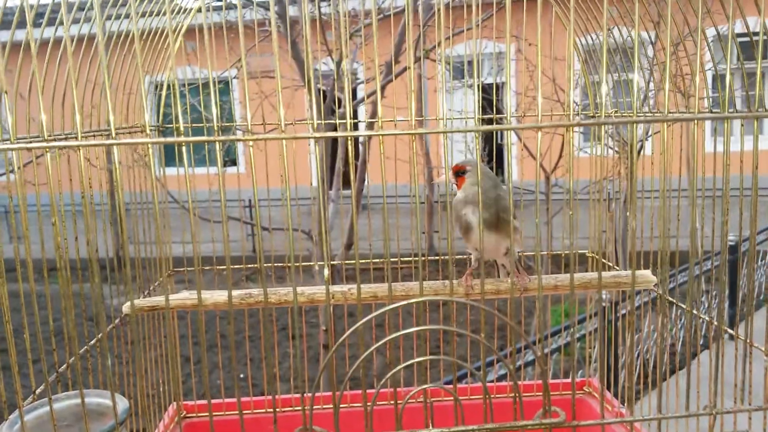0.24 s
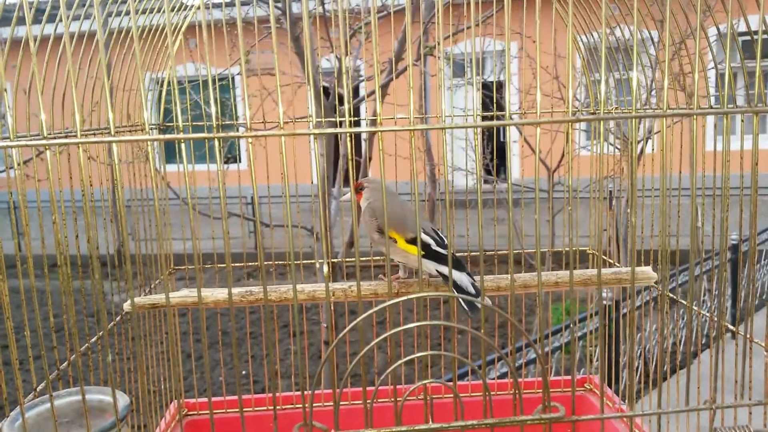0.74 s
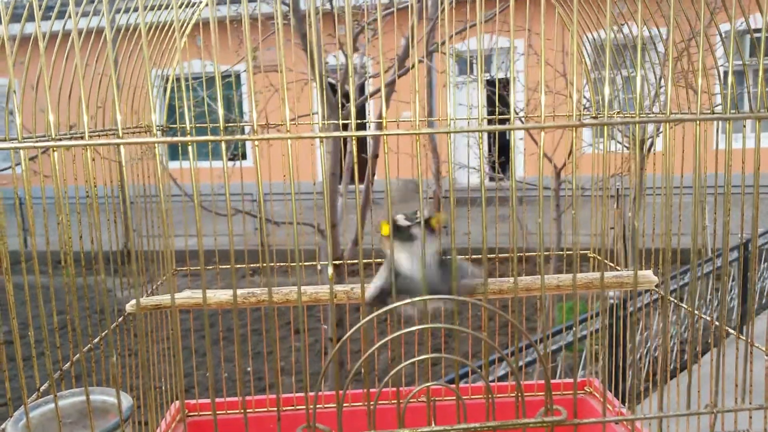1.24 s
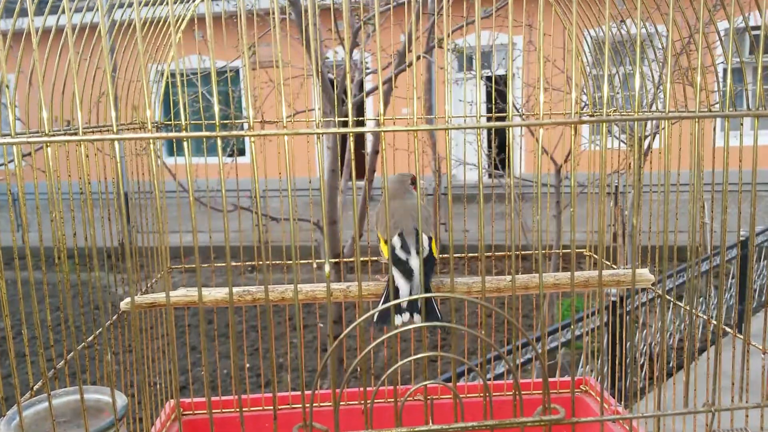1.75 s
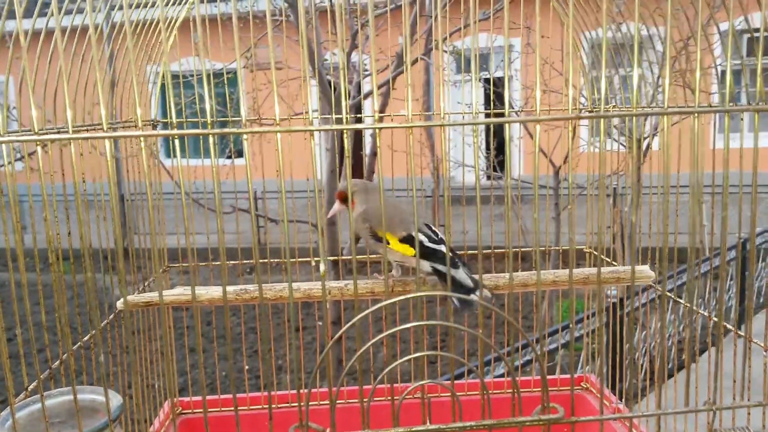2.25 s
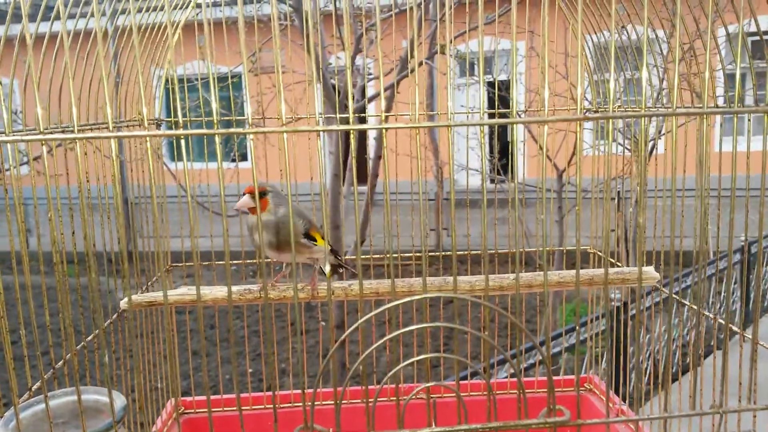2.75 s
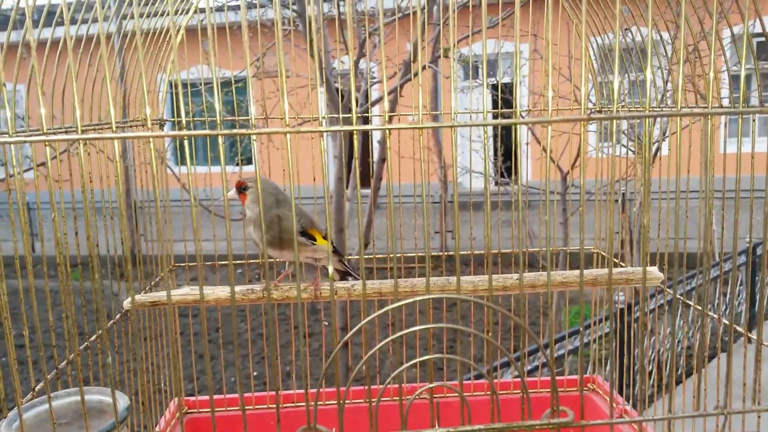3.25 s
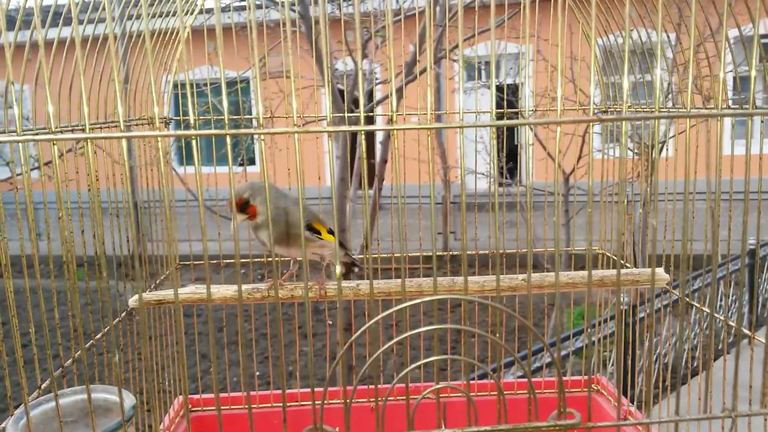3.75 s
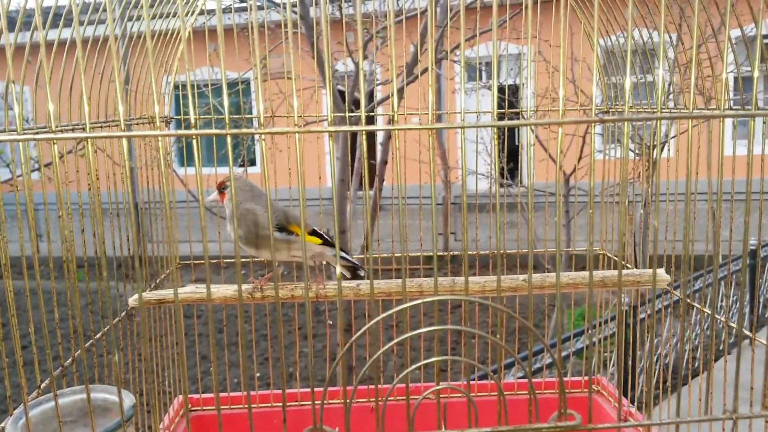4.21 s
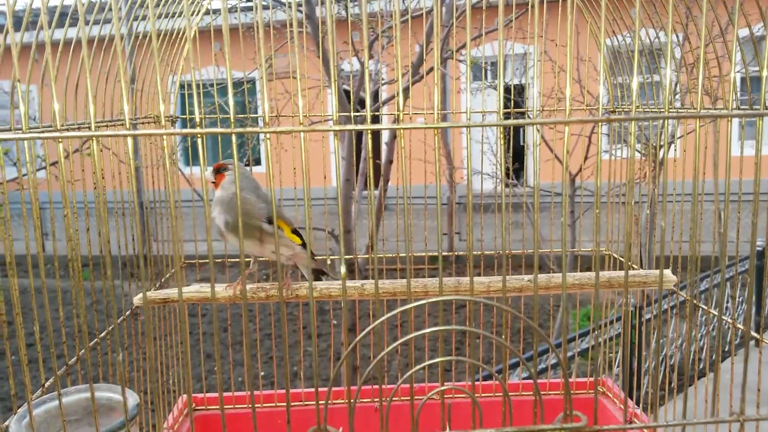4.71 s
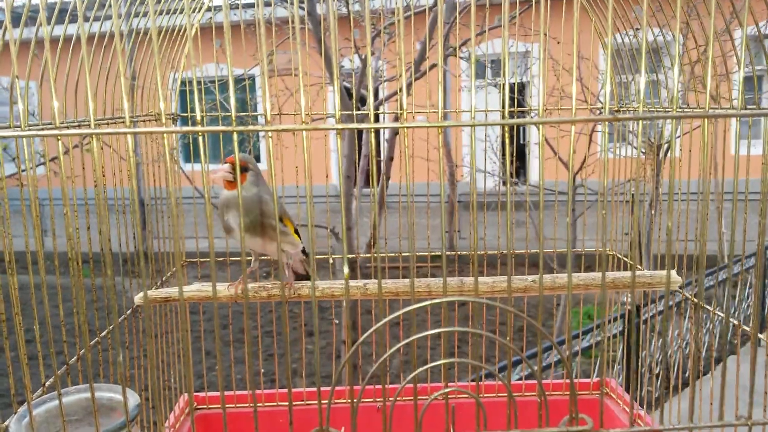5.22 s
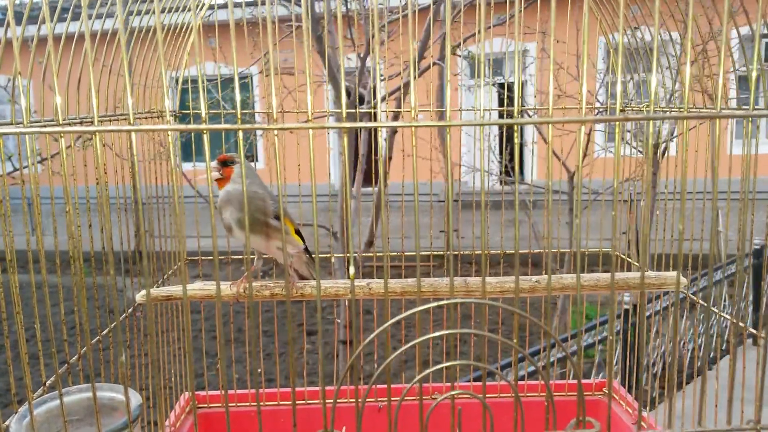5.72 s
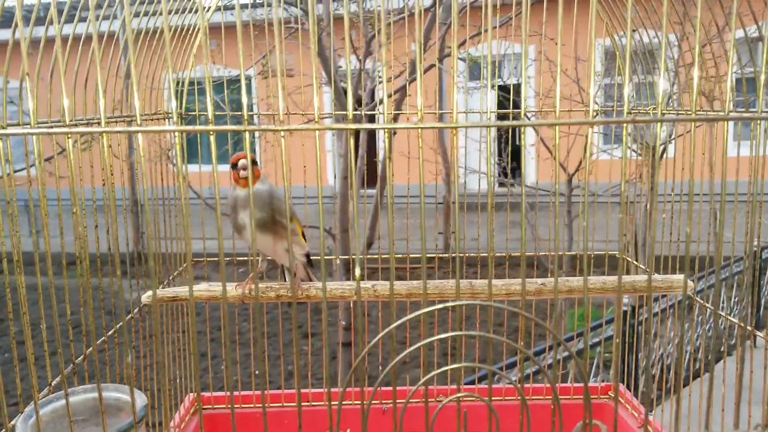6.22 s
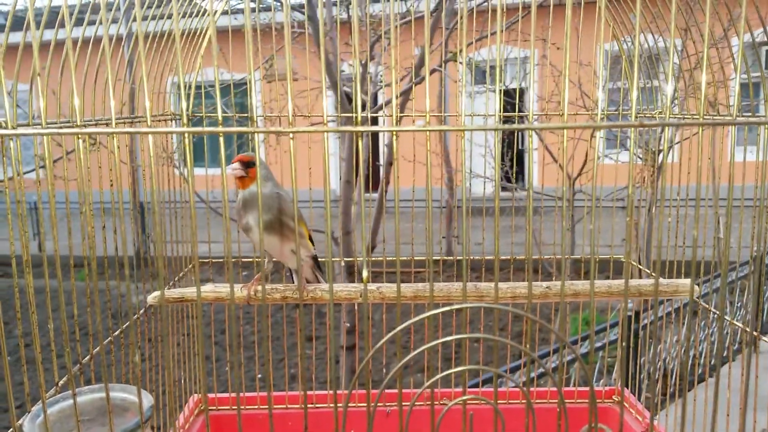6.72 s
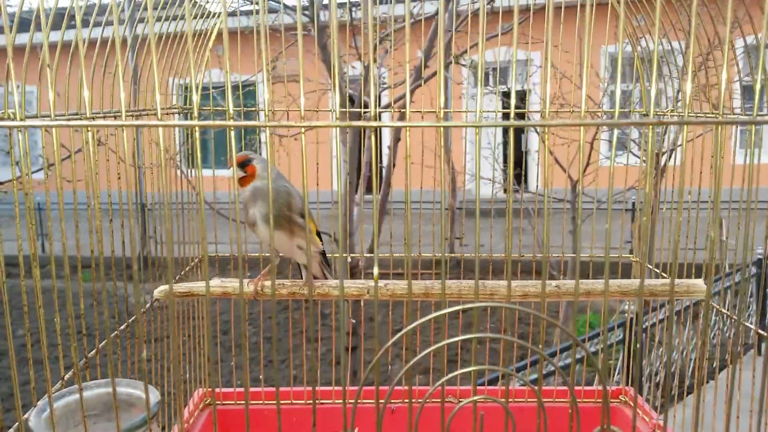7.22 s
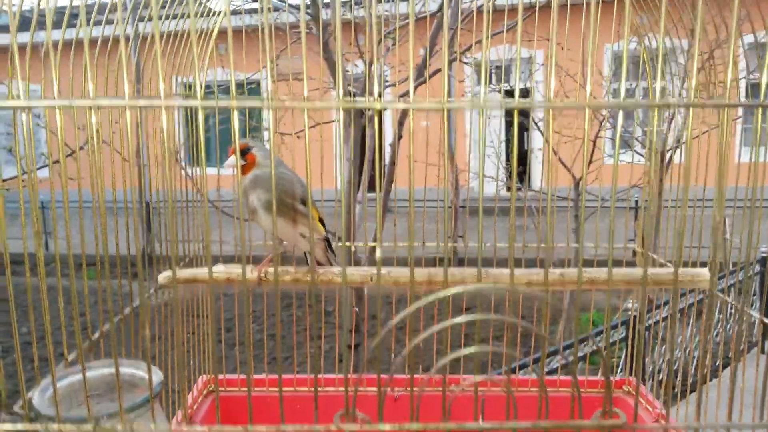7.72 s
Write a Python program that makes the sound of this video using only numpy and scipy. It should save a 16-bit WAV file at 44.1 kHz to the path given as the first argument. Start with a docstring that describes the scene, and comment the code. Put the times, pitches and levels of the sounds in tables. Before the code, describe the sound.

Outdoor air with faint echoing chirps and a slight feather rustle leads to a small finch's buzzy note, two-voiced falling whistle and rapid ticking chatter. Distant thin calls linger. A dull knock near the handheld microphone brings about a second and a half of airy hiss, then bright, piercing notes tumble out at close range, lightly reverberant, before near silence with soft handling thuds.

```python
"""Outdoor air and faint reverberant calls open the scene; then a caged goldfinch sings close by in a yard.
Gliding membrane tones make its whistles, two-voiced notes, buzzes and trills; pitch arches make its chatter.
Cage and wall answer as single echoes and a diffuse tail; runs of gliding tones, mostly reverberation,
make distant calls, a lingering chirp tail and a high hazy wash. Shaped noise gives air, rumble, rustle and
ticks, low sines the soft thuds; a knock of ringing modes is followed by a rush of hiss."""
import sys
import numpy as np
from scipy import signal
from scipy.fft import rfft, irfft, next_fast_len
from scipy.io import wavfile
from scipy.ndimage import uniform_filter1d, minimum_filter1d, map_coordinates

SR = 44100
rng = np.random.default_rng(int(sys.argv[2]) if len(sys.argv) > 2 else 0)


def inscribe(sig):
    """Save sig as 16-bit PCM at rate SR to the path in sys.argv[1].

    A 1-D sig is mono; a 2-D sig holds one channel per row.
    Samples are clipped to [-1, 1] before scaling.
    """
    pcm = np.round(np.clip(np.atleast_2d(sig).T, -1, 1) * 32767)
    wavfile.write(sys.argv[1], SR, pcm.astype(np.int16))


N = 351036
TIME = np.arange(N) / SR

# Clear notes of the high side of the syrinx: (start [s], length [s], onset [Hz], glide from [Hz],
# glide to [Hz], relative level [dB], level change over the note [dB], attack [s], release [s])
HIGH_NOTES = [(0.694, 0.025, 4190, 6580, 5350, -30.5, -2, .003, 0.0075),
              (1.334, 0.17, 4152, 6140, 6154, -13.5, -5, 0.029, 0.008),
              (1.503, 0.23, 6190, 5330, 3707, -14, -11, 0.015, 0.031),
              (5.036, 0.039, 3100, 4840, 4926, -9.5, 6, 0.0086, 0.0082),
              (5.157, 0.028, 8400, 7530, 8340, -9.5, -2, 0.008, 0.025),
              (5.221, 0.048, 3565, 5720, 5905, -7, 4, 0.0071, 0.018),
              (5.346, 0.22, 4100, 4424, 5958, -8.5, 3.5, .12, 0.02),
              (5.645, 0.0066, 5335, 4800, 9500, -13.5, -17, 0.0018, 0.0022),
              (5.653, 0.034, 10200, 9080, 7760, -21.5, 12.5, 0.0022, 0.0031),
              (5.679, .074, 8200, 7610, 6530, -9, -2, 0.013, 0.006),
              (5.793, 0.032, 4270, 5740, 5410, -8.5, 1, 0.015, 0.029),
              (5.838, 0.015, 4130, 4860, 5870, -21, 8.5, 0.00497, 0.004),
              (5.915, 0.016, 6300, 4967, 4990, -16, 2.5, 0.00395, 0.0042),
              (6.168, 0.048, 8600, 7230, 6710, -12, 1.5, 0.016, 0.013),
              (6.298, 0.078, 6720, 7525, 7346, -14, 14.5, 0.034, 0.011)]
# The low side of the syrinx, often sounding with the high one; columns as in HIGH_NOTES
LOW_NOTES = [(1.336, 0.175, 3563, 4645, 4800, -22, -2.5, .008, 0.021),
             (5.153, 0.039, 7100, 5925, 6174, -25, 2.5, 0.0028, 0.015),
             (6.166, 0.05, 6520, 5800, 4690, -25.5, -2.5, 0.026, 0.025),
             (6.237, 0.088, 3288, 3720, 4690, -21, 20, 0.0061, 0.025),
             (6.31, 0.068, 4380, 4646, 4916, -27.5, -10.5, 0.012, 0.011),
             (5.855, .022, 3660, 4650, 3317, -20.5, -14.5, 0.007, 0.0054),
             (5.975, 0.08, 3770, 3620, 2393, -36.5, -26.5, 0.0026, 0.0068),
             (6.648, 0.016, 4480, 4190, 5250, -25, 7, 0.0067, 0.00317)]
# Low chirps with a strong octave; columns as in HIGH_NOTES
REEDY_CHIRPS = [(.728, 0.036, 3050, 2960, 3070, -43.5, -7, 0.0045, .005),
                (.759, 0.022, 4707, 4050, 3610, -35.5, 2, 0.006, 0.006),
                (0.795, 0.022, 4600, 4084, 3586, -36, 0.5, 0.006, 0.0088),
                (4.949, 0.035, 2476, 2943, 3107, -13, -3, 0.022, 0.036)]
# Buzzes, burrs and trills: the columns of HIGH_NOTES, then (shake [Hz], shake depth [share of pitch],
# pulsing [0-1], octave [dB], roughness [0-1])
SHAKEN_NOTES = [(1.248, .088, 2948, 3270, 3830, -16, 10.5, 0.007, .012, 331, 0.013, 0.45, 15, 0.3),
                (1.315, 0.041, 4060, 3658, 5740, -22, 11.5, .012, .014, 706, 0.027, 0.74, -17.5, .15),
                (5.31, 0.056, 2990, 3330, 4350, -14.5, 25, 0.03, 0.056, 439, .02, 0.14, -13, .15),
                (5.598, 0.03, 3404, 3930, 4790, -18, 8.5, 0.032, 0.012, 860, 0.15, 0.62, -6, 0.4),
                (6.459, 0.13, 9040, 8870, 5490, -7.5, 4, 0.07, 0.046, 243.7, .07, 0.54, -32.5, 0.13),
                (6.574, .032, 5360, 5000, 3437, -28, -10, 0.0044, 0.013, 118.7, 0.13, 0.51, -14.5, 0.72),
                (5.928, 0.056, 3780, 4167, 3724, -23.5, -4.5, 0.0048, .003, 100.7, 0.081, 0.44, -17.5, 0.18),
                (6.663, 0.14, 4290, 3985, 3593, -23, -8.5, 0.0038, 0.023, 122.4, 0.069, 0.34, -17.5, 0.04)]
# Quick dips in pitch and back: (start [s], length [s], top [Hz], bottom [Hz], relative level [dB])
FLICKS = [(5.891, 0.014, 6586, 4644, -9.5), (6.624, 0.015, 7760, 4530, -10.5)]
# Chatter, one pitch arch each: (time [s], relative level [dB])
CHIPS = [(1.839, -18), (1.858, -18.5), (1.875, -20), (1.8927, -20), (1.973, -22), (1.9921, -20),
         (2.0105, -17.5), (2.028, -20.5)]
SETTLE = 0.15  # time constant of the snap onto pitch, as a share of the note
FLICK_TURN = 0.38  # the bottom of a flick, as a share of its length
ROUGH_JITTER, ROUGH_GRIT = 0.057, 0.1  # at full roughness: pitch scatter [share], phase scatter [rad]

# Breath noise in the syrinx: (frequency [Hz], level [dB])
TURBULENCE_COLOUR = [(1500, -39), (3500, -17.5), (5500, 6.5), (7500, 0.5), (9500, -3.5), (14000, -8)]
TURBULENCE_DB, TURBULENCE_GROWS = -41, 0.45  # gain at full voice; dB gained per dB of voice
# How the song reaches the ports while the bird is turned away:
# (frequency [Hz], left-right [dB], left lead [rad])
TURNED_AWAY = [(3000, 3.5, 0), (3760, 14.5, -0.5), (3900, 6.5, -1), (4750, 5.5, 0.4), (5520, 14.5, 0.5),
               (6100, 13.5, 0.7), (7300, 3, 1.45), (7250, -2.5, -4), (9400, -3, 3.5)]
# The same once it faces them; columns as in TURNED_AWAY
FACING = [(3320, -7.5, .5), (3750, 2.5, 1.2), (4300, 9.5, 1.2), (4550, -1, 1.35), (4860, 5, 2.76),
          (5400, -5.5, 2.66), (5800, 13.5, 3.8), (6500, 4.5, 4.1), (6840, -3.5, 5.9), (8440, -9.5, 6.5),
          (9620, -3, 10.7)]
TURN_AT = 3.5  # s, the bird has turned round by now

# Reflections from tray, cage and walls: (delay [s], left [dB], right [dB])
ECHOES = [(.00205, -24.5, -19), (.0033, -17, -28.5), (0.0149, -25, -32), (.075, -33, -33.5),
          (.096, -29.5, -32)]
# How long the yard rings: (frequency [Hz], 60 dB decay [s])
YARD_DECAY = [(500, 0.12), (3500, 0.65), (6500, 0.6), (12000, 0.24)]
# Tone of the yard's tail: (frequency [Hz], level [dB])
YARD_COLOUR = [(500, 2), (3500, -4), (4800, -4.5), (7000, -4), (11000, -6)]

# Faint reverberant sounds: distant calls, runs of like notes, a lingering chirp tail and a high hazy wash:
# (start [s], end [s], rate [notes/s], first [Hz], last [Hz], onset offset [octaves],
# hoarseness [octaves], relative level [dB])
FAINT_RUNS = [(.035, 0.21, 22, 3498, 4030, -0.17, 0.035, -54.5),
              (0.14, .7, 24, 4525, 4486, -0.23, 0.014, -58), (.75, .87, 29, 3840, 3724, 0.22, .014, -54),
              (1.11, 1.25, 12, 4470, 3970, -0.048, 0.017, -66),
              (2.078, 2.93, 8.62, 5450, 5220, .15, .012, -56.5), (2.1, 2.9, 11, 3950, 4100, .12, .08, -66),
              (2.05, 2.95, 7.1, 6500, 6200, .05, .13, -62),
              (2.85, 3.01, 55, 5980, 5130, 0.0062, 0.159, -53.5),
              (3.04, 3.13, 22, 3520, 3500, -0.47, 0.035, -66),
              (3.35, 3.44, 11, 3050, 3110, -0.15, .015, -71),
              (4.6, 4.7, 24, 3500, 3810, -0.4, 0.021, -53.5),
              (7.38, 7.45, 24, 3420, 3470, 0.37, 0.038, -73), (7.61, 7.7, 48, 3370, 3545, -0.25, 0.04, -71)]
FAINT_DIRECT_DB, FAINT_WET_DB = 5.5, 6  # gains of their direct sound and of their reverberation

# Feather noise as the bird settles on its perch: (frequency [Hz], level [dB])
RUSTLE_COLOUR = [(1000, -24), (2500, -6.5), (4000, 3.5), (7500, -0.5), (10000, -20.5), (15000, -22)]
RUSTLE_AT, RUSTLE_WIDTH_S, RUSTLE_DB = 0.752, 0.079, -41
# Light scuffs at the cage: (time [s], envelope peak [dB])
TICKS = [(0.22, -37), (7.3342, -46.5), (7.898, -49)]
# Tone of the scuffs: (frequency [Hz], level [dB])
TICK_COLOUR = [(300, -10), (1800, -3), (7000, 8.5), (15000, -16)]
KNOCK_AT = 3.586  # s, the hard knock
# Dull knocks: (time [s], peak of the ringing body [dB])
KNOCKS = [(0.222, -37.5), (KNOCK_AT, -26)]
# Ringing modes of a knock: (frequency [Hz], relative level [dB], 60 dB decay [s])
KNOCK_MODES = [(264, -2.5, 0.71), (344.5, 4.5, 0.35), (776, 2.5, 0.092), (1936, -12, 0.096)]
# Soft bumps on the microphone: (time [s], relative level [dB])
BUMPS = [(0.22, -37.5), (3.341, -44), (6.201, -46), (7.471, -36.5), (7.553, -40.5)]

# The outdoor air bed: (time [s], level [dB])
AIR = [(0, -47), (.8, -48), (1.2, -53.5), (1.8, -52), (2.05, -61), (2.8, -58.5), (3.3, -52.5), (5, -50),
       (5.7, -61), (6.2, -63.5), (7.25, -63.5), (7.96, -53)]
# Tone of the air: (frequency [Hz], level [dB])
AIR_COLOUR = [(100, -1), (320, -1.5), (500, -6.5), (760, -5.5), (1200, -9.5), (2000, -12), (4500, -17.5),
              (6800, -14), (9500, -27), (14500, -34.5)]
# Tone of the rumble under the air: (frequency [Hz], level [dB])
RUMBLE_COLOUR = [(20, -22.5), (80, -0.5), (150, -3), (500, -40)]
# Tone of the rush after the knock: (frequency [Hz], level [dB])
HISS_COLOUR = [(100, -9.5), (280, -2.5), (780, 1), (1200, -5.5), (1950, -2), (2300, -10), (3000, -5.5),
               (5200, -7), (6900, 4.5), (9000, -11), (12000, -18), (14500, -31)]
# The hiss sags slowly, then dies away
HISS_DB, HISS_SAG_DB_PER_S, HISS_HOLD_S, HISS_FADE_DB_PER_S = -34.5, 3, 1.487, 50.5

# The two microphone ports hear the surroundings differently: (frequency [Hz], left-right [dB])
PORTS = [(500, -0.5), (1700, 2), (3400, 0.5), (3900, 4.5), (5100, -0.5), (6150, 15.5), (7200, -6),
         (9500, -9)]
PORT_LAG_S = 0.000406  # the left port hears everything later than the right
TOP_HZ = 14900


def amp(db):
    """Decibels to gain."""
    return 10 ** (np.asarray(db) / 20)


def unit(x):
    """Scale to rms 1."""
    return x / np.sqrt(np.mean(x ** 2) + 1e-20)


def along(points, hz):
    """Read (Hz, value) points on a log frequency axis."""
    f, v = np.transpose(points)
    return np.interp(np.log(hz + 1), np.log(f), v)


def curves(rows, t):
    """Each column after the time, read at times t."""
    s, *cols = np.transpose(rows)
    return [np.interp(t, s, c) for c in cols]


def wobble(rate, t):
    """A smooth random curve with rate knots a second."""
    knots = (t - t[0]) * rate
    return map_coordinates(rng.standard_normal(int(knots[-1]) + 4), [knots])


def filtered(x, response):
    """Shape the spectrum of x by a function of frequency."""
    size = x.shape[-1]
    m = next_fast_len(size + 8192)
    return irfft(rfft(x, m) * response(np.fft.rfftfreq(m, 1 / SR)), m)[..., :size]


def noise(colour, side_db, mono_below_hz=700):
    """Coloured stereo noise of rms 1 whose width narrows towards the bass."""
    mid, side = filtered(rng.standard_normal((2, N)), lambda hz: amp(along(colour, hz)))
    side = filtered(side, lambda hz: amp(side_db) * hz / np.hypot(hz, mono_below_hz))
    return unit(np.array([mid + side, mid - side]))


def add(track, s, sound):
    """Mix a sound into a track at time s."""
    part = track[..., max(round(s * SR), 0):][..., :sound.shape[-1]]
    part += sound[..., :part.shape[-1]]


def phase_of(hz):
    """Running phase of a gliding pitch."""
    return 2 * np.pi * np.cumsum(hz) / SR


def split(left_right_db):
    """Left and right gains of constant total power."""
    sides = amp(left_right_db * np.array([[.5], [-.5]]))
    return np.sqrt(2) * sides / np.hypot(*sides)


def song():
    """Both sides of the syrinx sing; where they overlap they make sum and difference tones."""
    high = sum(membrane(row[0], *syllable(row), octave_db=-29.5, rough=0.089, third_below_db=4.0)
               for row in HIGH_NOTES)
    low = sum(membrane(row[0], *syllable(row), octave_db=-13.5, rough=0.049) for row in LOW_NOTES)
    mixing = amp(-5) * high * low + amp(9) * high ** 2 * low
    mixing_colour = [(1500, -36.0), (7400, 19.0), (10000, 3.5), (11000, 4.0), (14000, -9.5)]  # (Hz, dB)
    voice = high + low + filtered(mixing, lambda hz: amp(along(mixing_colour, hz)))
    voice += sum(membrane(row[0], *syllable(row), octave_db=4, rough=.15) for row in REEDY_CHIRPS)
    for *row, shake_hz, depth, pulsing, octave_db, rough in SHAKEN_NOTES:
        voice += membrane(row[0], *syllable(row), octave_db, rough, shake_hz, depth, pulsing,
                          third_below_db=25.5)
    return voice + flicks()


def syllable(row):
    """Pitch and gain of one note: a snap onto a straight glide, under an attack, a level change and a release."""
    _, length, onset_hz, from_hz, to_hz, db, change_db, attack, release = row
    t = np.arange(max(round(length * SR), 256)) / SR
    u = t / t[-1]
    glide = from_hz + (to_hz - from_hz) * u
    snap = (onset_hz - from_hz) * np.exp(-u / SETTLE)
    ramp = lambda share: np.sin(np.pi / 2 * np.clip(share, 0, 1))
    gain = amp(db + change_db * (u - .5)) * ramp(t / attack) * ramp((t[-1] - t) / release)
    return glide + snap, gain


def membrane(start, hz, gain, octave_db, rough, shake_hz=0, shake_depth=0, pulsing=0, third_below_db=16):
    """A membrane tone with two overtones; a shake swings its pitch and pulses its level."""
    t = np.arange(len(hz)) / SR
    shake = phase_of(shake_hz * (1 + .05 * wobble(60, t)))
    phase = phase_of(hz * (1 + shake_depth * np.sin(shake) + rough * ROUGH_JITTER * wobble(900, t)))
    phase += rough * ROUGH_GRIT * wobble(4000, t)
    # The throat passes an octave the better, the lower the note lies
    octave = amp(octave_db - 10 * np.log2(hz / 4000))
    third = amp(octave_db - third_below_db) * (3 * hz < SR / 2)
    tone = np.sin(phase) + octave * np.sin(2 * phase) + third * np.sin(3 * phase)
    tone = tone / np.hypot(1, octave)
    flutter = amp(1.1 * wobble(140, t))
    pulse = unit(1 + pulsing * np.cos(shake + 1))
    out = np.zeros(N)
    add(out, start, np.sqrt(2) * tone * gain * flutter * pulse)
    return out


def flicks(dip_db=9):
    """The pitch dives and springs back; the voice weakens at the bottom."""
    out = np.zeros(N)
    for start, length, top_hz, bottom_hz, db in FLICKS:
        u = np.linspace(0, 1, round(length * SR))
        depth = np.interp(u, [0, FLICK_TURN, 1], [0, 1, 0])
        gain = amp(db - 0.5 - dip_db * depth ** 4) * np.sqrt(depth)
        hz = top_hz + (bottom_hz - top_hz) * np.sin(np.pi / 2 * depth) ** 2
        out += membrane(start, hz, gain, octave_db=-28.5, rough=0.065)
    return out


def chatter(length=.013, foot_hz=1750, crest_hz=3300, throat_hz=6350, sharpness=2.0):
    """Each chip arches up and down; the throat resonance favours its second and third harmonics."""
    out = np.zeros(N)
    t = np.arange(round(length * SR)) / SR
    arch = np.abs(np.sin(np.pi * t / length))
    effort = np.sqrt(arch) * (1 - 0.55 * arch ** 4) * amp(-4 * t / length)  # strongest on the flanks
    throat = lambda f: 1 / (1 + (sharpness * (f / throat_hz - throat_hz / f)) ** 2)
    for s, db in CHIPS:
        hz = (foot_hz + (crest_hz - foot_hz) * arch) * (1 + .04 * wobble(1800, t))
        chip = sum(amp(level) * throat(k * hz) * np.sin(k * phase_of(hz))
                   for k, level in enumerate([-17, 0, -3], 1))
        # The bars scatter the fast sweep for a few milliseconds
        scatter = rng.standard_normal(len(t)) * amp(-60 * t / .018)
        scatter *= amp(3) / np.linalg.norm(scatter)
        scatter[0] = 1  # the direct sound
        add(out, s, amp(db + 2.0) * unit(signal.fftconvolve(chip * effort, scatter)))
    return out


def turbulence(voice):
    """A faint breath hiss that follows the strength of the voice."""
    strength = np.sqrt(np.abs(uniform_filter1d(voice ** 2, size=130)))
    return amp(TURBULENCE_DB) * strength ** TURBULENCE_GROWS * noise(TURBULENCE_COLOUR, side_db=2.5)


def beamed(x, pose):
    """The finch's pose sets level and phase of each frequency at the two ports."""
    hz_points, left_right_db, lead = np.transpose(pose)
    read = lambda values, hz: np.interp(hz, hz_points, values)
    turn = lambda hz: np.exp(1j * read(lead, hz) * np.array([[.5], [-.5]]))
    return filtered(x, lambda hz: split(read(left_right_db, hz)) * turn(hz))


def echoes(x):
    """Single reflections from nearby surfaces."""
    out = np.zeros((2, N))
    for delay, left_db, right_db in ECHOES:
        add(out, delay, x * amp([[left_db], [right_db]]))
    return out


def yard(x):
    """The diffuse tail of the yard: noise in which each frequency dies at its own speed."""
    hz, t, z = signal.stft(rng.standard_normal((2, SR)), SR, nperseg=256)
    fade_db = along(YARD_COLOUR, hz)[:, None] - 60 * t / along(YARD_DECAY, hz)[:, None]
    tail = signal.istft(z * amp(fade_db), SR, nperseg=256)[1]
    return signal.fftconvolve(x, tail / np.linalg.norm(tail[0]), axes=1)[:, :N]


def runs(table):
    """Runs of like notes, each swelling quickly and settling onto its pitch; the strength wavers."""
    out = np.zeros(N)
    for start, end, rate, first_hz, last_hz, slide, hoarse, db in table:
        t = np.arange(max(round((end - start) * SR), 256)) / SR
        within = (t * rate + .06 * wobble(rate, t)) % 1  # place inside the current note, 0-1
        waver = hoarse * wobble(1500, t) + .008 * wobble(25, t)
        strength_db = 2.5 * wobble(30, t) - 12 * (2 * t / t[-1] - 1) ** 4  # weaker at both ends of the run
        hz = np.linspace(first_hz, last_hz, len(t)) * 2 ** (slide * np.exp(-within / SETTLE) + waver)
        swell = np.sin(np.pi * np.sqrt(within)) * (1 - within)
        add(out, start, amp(db) * unit(amp(strength_db) * swell * np.sin(phase_of(hz))))
    return np.array([out, out])


def rustle():
    """A brief swell of feather noise."""
    swell = np.exp(-.5 * ((TIME - RUSTLE_AT) / RUSTLE_WIDTH_S) ** 2)
    return swell * amp(RUSTLE_DB + 4.0 * wobble(73, TIME)) * noise(RUSTLE_COLOUR, side_db=0.0)


def ticks():
    """Short dry scuffs at the cage: noise that starts at once and decays."""
    level, t = np.zeros(N), np.arange(SR // 4) / SR
    fade_db = -60 * t / .17
    for s, db in TICKS:
        add(level, s, amp(db + fade_db))
    return level * noise(TICK_COLOUR, side_db=1.0)


def knock():
    """Dull knocks of decaying modes; the hard one has a brief crack of noise."""
    t = np.arange(SR // 2) / SR
    ring = sum(amp(db - 60 * t / t60) * np.sin(2 * np.pi * hz * t) for hz, db, t60 in KNOCK_MODES)
    body, crack = np.zeros(N), np.zeros(N)
    for s, db in KNOCKS:
        add(body, s, amp(db) * ring / np.abs(ring).max())
    add(crack, KNOCK_AT, amp(-24.5 - 60 * t / 0.07))
    crack_colour = [(350, -4.0), (1200, -8.0), (2000, -6.0), (3200, -8.0), (4500, -11.5), (12000, -24.5)]
    return body + crack * noise(crack_colour, side_db=-5.5)


def bumps(thud_hz=75, t60=0.15):
    """Low thuds of scattered pitch that swell softly and die fast, a little differently in each port."""
    out, t = np.zeros((2, N)), np.arange(SR // 4) / SR
    swell = np.tanh(2 * thud_hz * t) ** 2
    for s, db in BUMPS:
        hz = thud_hz * np.exp(0.32 * rng.standard_normal())
        phase = 2 * np.pi * hz * t + np.array([wobble(112, t), wobble(117, t)])
        add(out, s, amp(db + 9 - 60 * t / t60) * swell * np.sin(phase))
    return out * amp([[-4], [2]])


def background():
    """Rumble and air share one level, which sinks after loud song and recovers; hiss sets in with the knock."""
    air_db, age = curves(AIR, TIME)[0], np.maximum(TIME - KNOCK_AT, 0)
    hiss_db = HISS_DB - HISS_SAG_DB_PER_S * age - HISS_FADE_DB_PER_S * np.maximum(age - HISS_HOLD_S, 0)
    rumble_sway_db = 2.5 * wobble(9, TIME)
    rumble_db = 0.67 * air_db - 27.5 + rumble_sway_db
    rumble = amp(rumble_db) * noise(RUMBLE_COLOUR, side_db=-10.5, mono_below_hz=10) * amp([[-3], [2]])
    air_sway_db, hiss_sway_db = .9 * wobble(12, TIME), .6 * wobble(45, TIME)
    air = amp(air_db + air_sway_db) * noise(AIR_COLOUR, side_db=0.0)
    hiss = (age > 0) * amp(hiss_db + hiss_sway_db) * noise(HISS_COLOUR, side_db=-5.0)
    return rumble + air + hiss


def ports(x):
    """Split each frequency of the surroundings between the two ports, keeping its power."""
    return filtered(x, lambda hz: split(along(PORTS, hz)))


def scene():
    """The finch is close and nearly dry; the faint sounds carry strong reverberation."""
    voice = song() + chatter()
    sung = voice + turbulence(voice)
    finch = beamed(sung * (TIME < TURN_AT), TURNED_AWAY) + beamed(sung * (TIME >= TURN_AT), FACING)
    near = finch + echoes(voice) + amp(-20.5) * yard(finch)
    faint = runs(FAINT_RUNS)
    faint_in_yard = amp(FAINT_DIRECT_DB) * faint + amp(FAINT_WET_DB) * yard(faint)
    around = faint_in_yard + rustle() + ticks() + knock() + background()
    return near + ports(around) + bumps()


def record(dry):
    """The left port lags; the microphone distorts slightly, a limiter tames peaks, and the band ends at the top."""
    x = filtered(dry, lambda hz: np.exp(np.pi * 1j * hz * PORT_LAG_S * np.array([[-1], [1]])))
    difference_tones = filtered(x ** 2, lambda hz: (hz > 300) & (hz < 1500))
    x = x + amp(-28) * difference_tones
    needed = 1 / np.maximum(np.abs(x).max(axis=0), 1)
    gain = uniform_filter1d(minimum_filter1d(needed, size=400), size=200)
    return filtered(x * gain, lambda hz: hz < TOP_HZ)


dry = scene()
out = record(dry)
inscribe(out)
```